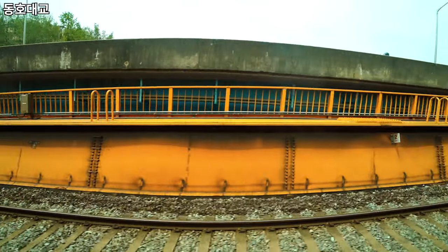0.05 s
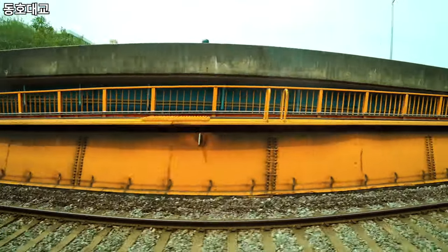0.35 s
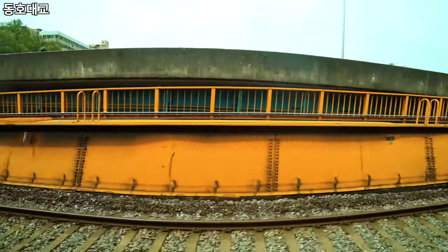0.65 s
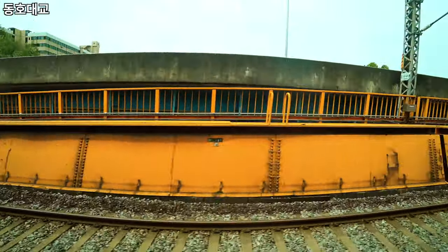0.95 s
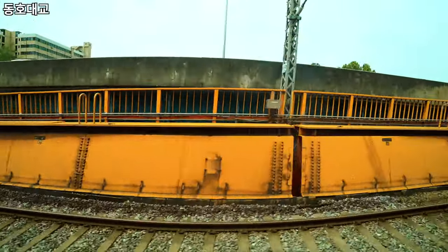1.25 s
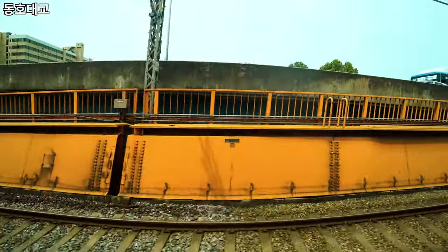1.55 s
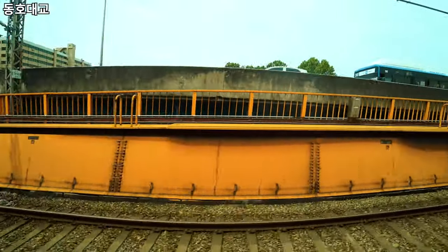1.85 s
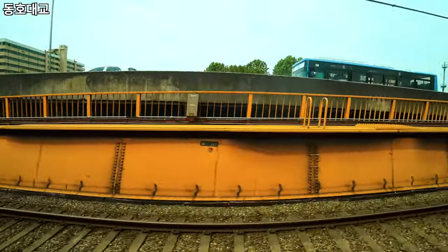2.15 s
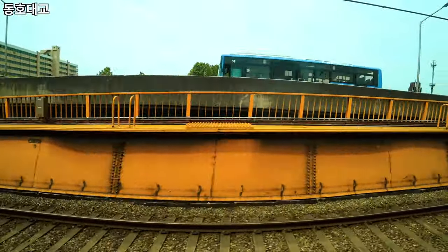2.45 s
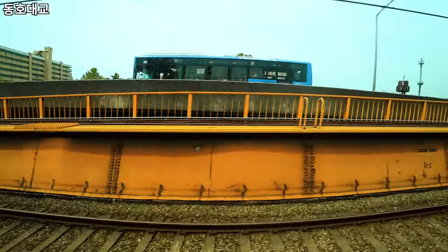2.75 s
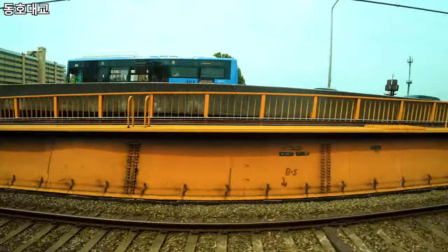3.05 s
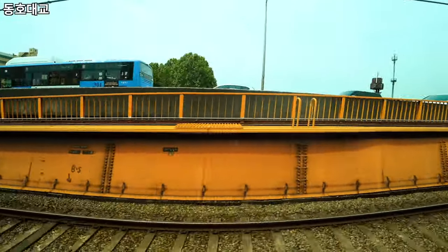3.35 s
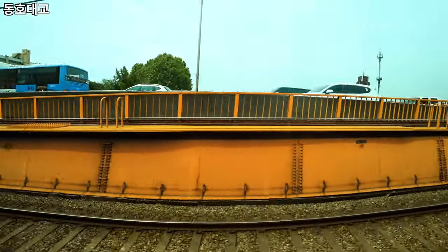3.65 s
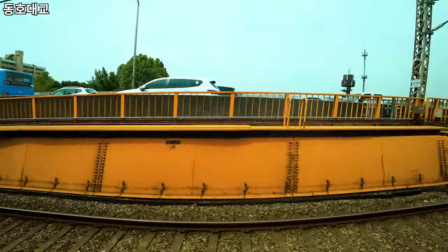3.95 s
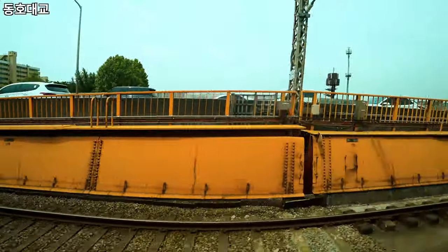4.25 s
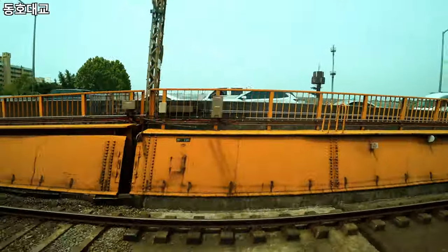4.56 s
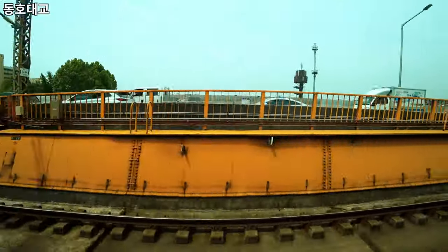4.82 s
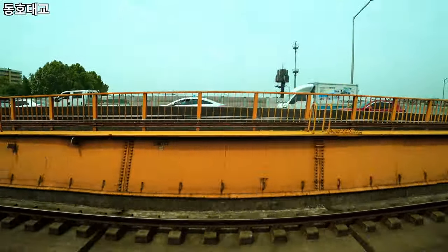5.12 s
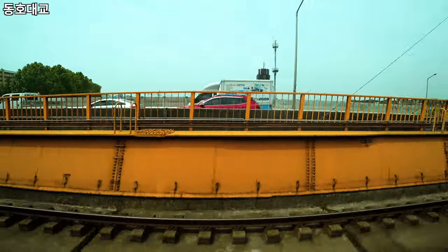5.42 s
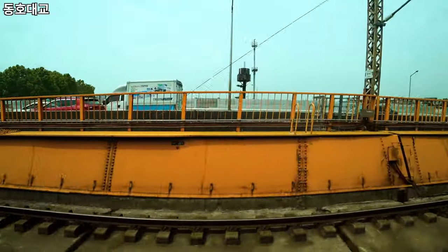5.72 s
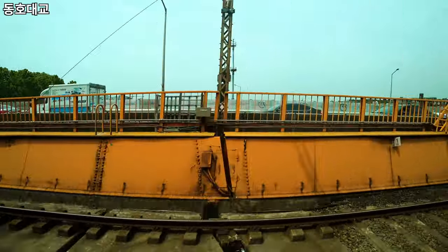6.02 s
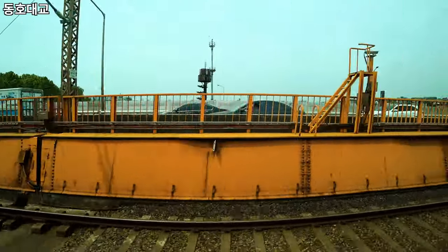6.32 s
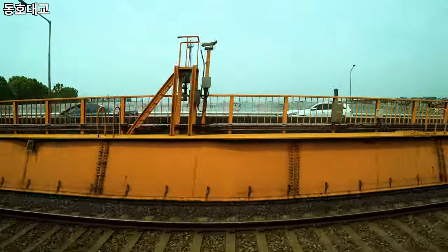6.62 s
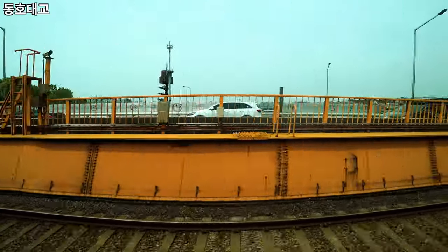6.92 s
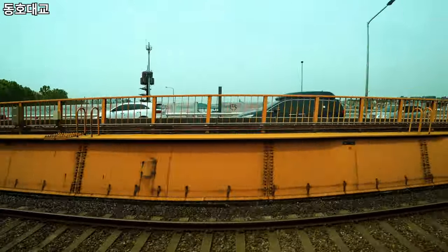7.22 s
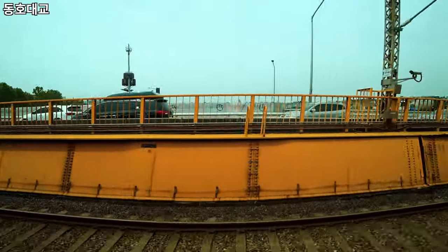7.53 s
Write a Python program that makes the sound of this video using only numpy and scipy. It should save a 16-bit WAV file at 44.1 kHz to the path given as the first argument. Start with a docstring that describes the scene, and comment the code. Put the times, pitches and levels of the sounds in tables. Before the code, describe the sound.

A subway train rumbles loudly over a steel bridge, heard from inside, with roaring wheels, soft bumps and a faint hiss of air.

```python
"""Inside a subway car rolling over a steel girder bridge.
The floor rumbles on its springs, the cabin air booms, and the wheels roar through the car body.
Rippled rail howls on one span; dips in the rail set body and girders ringing.
The rail rushes, short swells of noise stand out, and air hisses and spurts at the door seal.
Now and then a buffet of air pins the microphone and cuts the sound for a few milliseconds."""
import sys
import numpy as np
from scipy import signal
from scipy.fft import rfft, irfft, next_fast_len
from scipy.io import wavfile
from scipy.ndimage import uniform_filter1d

SR = 44100
rng = np.random.default_rng(int(sys.argv[2]) if len(sys.argv) > 2 else 0)


def materialize(psi):
    """Save the field psi as 16-bit PCM at rate SR to the path in sys.argv[1].

    A 1-D psi becomes a single channel; in a 2-D psi each row is a channel.
    """
    bounded = np.clip(np.atleast_2d(psi).T, -1, 1)
    quanta = np.round(bounded * 32767).astype(np.int16)
    wavfile.write(sys.argv[1], SR, quanta)


N = 334278
TIME_S = np.arange(N) / SR
FFT_SIZE = next_fast_len(N, real=True)
FREQ_HZ = np.maximum(np.fft.rfftfreq(FFT_SIZE, 1 / SR), 1)


def from_db(db):
    """Decibels to gain."""
    return 10 ** (np.asarray(db) / 20)


def curves(rows):
    """One per-sample curve for each column after time_s."""
    time_s, *columns = np.transpose(rows)
    return [np.interp(TIME_S, time_s, column) for column in columns]


def swells(rows, sigma_s):
    """One track of Gaussian swells for each column after centre_s."""
    centre_s, *columns = np.transpose(rows)
    bells = np.exp(-0.5 * np.minimum(((TIME_S - centre_s[:, None]) / sigma_s) ** 2, 100))
    return [heights @ bells for heights in columns]


def spectrum(points):
    """Response through (freq_hz, level_db) points, steep beyond both ends."""
    freq_hz, level_db = np.transpose(points)
    skirts = np.minimum(1, np.minimum(FREQ_HZ / freq_hz[0], freq_hz[-1] / FREQ_HZ)) ** 6
    return skirts * from_db(np.interp(np.log(FREQ_HZ), np.log(freq_hz), level_db))


def resonances(modes):
    """Response of steep-sided resonances, summed in power."""
    power = 0
    for freq_hz, width_hz, level_db in modes:
        detuning = (FREQ_HZ - freq_hz ** 2 / FREQ_HZ) / (2 * width_hz)
        power += (from_db(level_db) / (1 + 2 * detuning ** 2)) ** 2
    return np.sqrt(power)


def lowpass(corner_hz, order=2):
    """Low-pass response, half gain at the corner."""
    return 1 / (1 + (FREQ_HZ / corner_hz) ** order)


def shaped(x, response):
    """Filter by a frequency response."""
    return irfft(rfft(x, FFT_SIZE) * response, FFT_SIZE)[:N]


def noise(response):
    """Filtered Gaussian noise, rms 1."""
    x = shaped(rng.standard_normal(FFT_SIZE), response)
    return x / np.sqrt(np.mean(x ** 2) + 1e-20)


def steady_noise(response, span_s):
    """Filtered noise with swells slower than span_s evened out, rms near 1."""
    x = noise(response)
    size = int(span_s * SR)
    power = uniform_filter1d(uniform_filter1d(x ** 2, size), size)
    return x / np.sqrt(power + 1e-12)


def flutter(rate_hz, depth_db):
    """Randomly wavering gain; depth_db is rms."""
    return from_db(depth_db * noise(lowpass(rate_hz)))


# freq_hz, level_db
RUMBLE_SPECTRUM = [(7, -13), (16, -2), (25, 5), (42, 1), (56, 6), (70, 0.5), (82, -3), (92, -13.5)]
# time_s, level_db
RUMBLE_LEVELS = [(0.0, -15), (0.25, -18), (1.7, -18), (2.1, -19), (2.55, -15.5), (3.0, -17), (4.0, -16),
                 (4.6, -19.5), (5.3, -13), (5.7, -19), (6.0, -14.5), (6.35, -15.5), (6.48, -24.5),
                 (6.7, -20.5), (7.0, -15), (7.55, -18.5)]

def floor_rumble(jolt_db):
    """The car floor heaves on its springs."""
    level_db, = curves(RUMBLE_LEVELS)
    return from_db(level_db + jolt_db + 1.25) * steady_noise(spectrum(RUMBLE_SPECTRUM), span_s=0.18)


# freq_hz, level_db
BOOM_SPECTRUM = [(78, 1), (88, 0.5), (98, 0.5), (116, 0.5), (135, -1), (155, -13.5)]
# time_s, level_db
BOOM_LEVELS = [(0.0, -20), (0.25, -32.5), (0.5, -28), (1.0, -19), (1.6, -19.5), (1.8, -22), (2.12, -23.5),
               (2.4, -20.5), (3.25, -26), (3.9, -16), (4.25, -21), (4.45, -25), (4.9, -19), (5.5, -26.5),
               (6.0, -22), (6.3, -18), (6.47, -21.5), (6.7, -17.5), (7.05, -30.5), (7.55, -21.5)]

def cabin_boom(jolt_db):
    """The cabin air booms in its lowest standing waves."""
    level_db, = curves(BOOM_LEVELS)
    boom = steady_noise(spectrum(BOOM_SPECTRUM), span_s=0.05)
    return from_db(level_db + jolt_db + 0.86) * boom * flutter(rate_hz=11, depth_db=0.1)


# centre_s, rumble_change_db, boom_change_db
JOLTS = [(0.28, 10, 12.5), (0.71, 3, 5.5), (1.59, 1.5, 2.5), (2.84, -1, 2), (2.99, -5, 6.5), (3.19, -2, 5),
         (3.43, -5, 10.5), (4.11, 2.5, 2), (4.55, 5, -7), (4.78, 5.5, -2.5), (5.69, 2, 6), (5.95, 1, 2),
         (6.59, 12, -1.5), (6.92, 3.5, -2)]

def track_jolts():
    """Uneven track jolts the car: brief dB changes for rumble and boom."""
    return swells(JOLTS, sigma_s=0.035)


# freq_hz, level_db
ROAR_SPECTRUM = [(110, -8), (150, -1.5), (195, 2), (220, -2), (255, -2), (300, -6), (400, -11), (490, -14),
                 (570, -14.5), (700, -18.5), (900, -39.5)]
# freq_hz, width_hz, level_db
BODY_MODES = [(185.5, 10.7, 4), (241.9, 12.2, 2), (276, 7.2, 2), (340.3, 9.9, -2), (466.6, 74, -10.5)]
# time_s, roar_db, rush_db
TRACK_ROUGHNESS = [(0.0, -26.5, -44.5), (0.45, -25, -48), (0.95, -23.5, -43), (1.3, -23.0, -45.5),
                   (1.45, -22, -45), (1.72, -23.5, -43), (2.05, -26, -47), (2.4, -23.5, -44.5),
                   (3.0, -24, -45), (3.55, -23.5, -44), (3.95, -24, -44), (4.4, -23.5, -45.5),
                   (5.1, -24.5, -45.5), (5.55, -24.5, -44), (5.9, -23, -43.5), (6.25, -24.5, -45),
                   (6.42, -26, -48), (6.65, -24, -44), (7.15, -25.5, -48), (7.55, -24.5, -45.5)]

def wheel_roar(jolt_db):
    """Rail roughness shakes the bogies; the car's panels ring with it."""
    roar_db, _ = curves(TRACK_ROUGHNESS)
    bogies = spectrum(ROAR_SPECTRUM)
    panels = resonances(BODY_MODES)
    panel_gain = from_db(-5.5) * np.linalg.norm(bogies) / np.linalg.norm(panels)
    shaking = steady_noise(np.hypot(bogies, panel_gain * panels), span_s=0.12)   # powers add
    return from_db(roar_db + jolt_db) * shaking * flutter(rate_hz=28, depth_db=0.9)


# time_s, howl_db, girder_db
HOWL_LEVELS = [(0, -46, -55), (1, -42, -41), (1.5, -47, -42.5), (2.1, -41.5, -42.5), (3, -43.5, -43),
               (3.7, -39, -41), (4.3, -39.5, -36.5), (4.55, -35, -44), (4.8, -37, -44.5),
               (5.05, -33.5, -40), (5.23, -31.5, -40), (5.38, -35.5, -37.5), (5.47, -33, -35),
               (5.6, -37, -32.5), (5.78, -30.5, -36), (5.9, -41, -28.5), (6.0, -41, -31.5),
               (6.12, -37, -40), (6.25, -38, -34.5), (6.42, -42, -44), (6.72, -37, -35.5), (7, -53, -47),
               (7.58, -39, -53)]
# time_s, pitch_hz
HOWL_PITCH = [(0, 660), (3.3, 680), (4.0, 705), (4.6, 695), (4.95, 712), (5.13, 720), (5.22, 698),
              (5.32, 686), (5.47, 670), (5.62, 668), (5.78, 652), (5.92, 630), (6.1, 690), (6.7, 690)]
# freq_hz, width_hz, level_db
GIRDER_MODES = [(345, 55, -2.5), (402, 55, 0.5), (507, 28, -7), (633, 63, -3), (727, 32, -7),
                (843, 70, -17)]

def rail_howl():
    """Rippled rail howls at speed over ripple length; the steel girders ring along."""
    howl_db, girder_db = curves(HOWL_LEVELS)
    pitch_hz, = curves(HOWL_PITCH)
    phase = 2 * np.pi * np.cumsum(pitch_hz) / SR
    spread = lowpass(corner_hz=14)
    howl = noise(spread) * np.cos(phase) + noise(spread) * np.sin(phase)
    size = int(0.06 * SR)   # even out swells slower than 60 ms
    howl /= np.sqrt(uniform_filter1d(uniform_filter1d(howl ** 2, size), size) + 1e-12)
    girders = steady_noise(resonances(GIRDER_MODES), span_s=0.28)
    fade = from_db(0.5 * (howl_db - howl_db.max()))   # both sink away from the open span
    return fade * (from_db(howl_db - 3.5) * howl + from_db(girder_db + 4.5) * girders)


# start_s, body_db, girder_db
BUMPS = [(1.36, -25, -37), (1.491, -19.5, -33.5), (2.77, -23.5, -37), (3.54, -20.5, -48),
         (3.79, -22.5, -43), (3.92, -24, -30), (4.16, -24, -48), (4.66, -28, -41), (4.915, -26, -27.5),
         (6.084, -30, -29), (6.919, -25.5, -32.5), (7.36, -32, -42)]

def wheel_bumps(rise_s, t60_s):
    """Wheels hit dips in the rail; each soft blow rings car body and girders."""
    body_gain, girder_gain = np.zeros((2, N))
    for start_s, body_db, girder_db in BUMPS:
        age_s = np.maximum(TIME_S - start_s, 0)
        envelope = from_db(-60 * age_s / t60_s) * (1 - np.exp(-age_s / rise_s))
        body_gain += from_db(body_db + 1) * envelope
        girder_gain += from_db(girder_db + 5.5) * envelope
    body = steady_noise(resonances(BODY_MODES), span_s=0.034)
    girders = steady_noise(resonances(GIRDER_MODES), span_s=0.038)
    return body_gain * body + girder_gain * girders


# freq_hz, level_db
RUSH_SPECTRUM = [(500, -25.5), (800, 3.5), (950, 1), (1300, -1.5), (1700, -6), (2200, -8), (2750, -12.5),
                 (3000, -17.5), (3250, -21), (4500, -19)]
# freq_hz, width_hz, level_db
WHEEL_MODES = [(1167, 17, 0.5), (1372, 19, -5.5)]

def rail_rush(puff_db):
    """The contact patches rush; the wheel discs sing faintly."""
    _, rush_db = curves(TRACK_ROUGHNESS)
    contact = noise(spectrum(RUSH_SPECTRUM))
    discs = from_db(-12) * noise(resonances(WHEEL_MODES))
    return from_db(rush_db + puff_db + 1.17) * (contact + discs)


# centre_s, sigma_s, freq_hz, width_hz, level_db
ACCENTS = [(0.264, 0.0085, 2400, 600, -43), (0.254, 0.0082, 4860, 2600, -48),
           (0.277, 0.035, 5400, 220, -60), (1.095, 0.02, 1160, 80, -38.5), (1.6, 0.12, 2570, 1500, -51),
           (1.722, 0.038, 1900, 250, -48.5), (1.726, 0.011, 2830, 197, -51),
           (5.31, 0.0083, 5430, 900, -53.5), (6.11, 0.028, 684, 55, -33), (6.557, .025, 5500, 2000, -58),
           (6.69, 0.004, 1200, 1100, -37)]

def brief_accents():
    """Short swells of band noise: scuffs, a clank, a broad rush and a flare of the howl."""
    wall = lowpass(corner_hz=9600, order=16)
    sound = np.zeros(N)
    for centre_s, sigma_s, freq_hz, width_hz, level_db in ACCENTS:
        envelope = np.exp(-0.5 * ((TIME_S - centre_s) / sigma_s) ** 2)
        sound += from_db(level_db) * envelope * noise(wall * resonances([(freq_hz, width_hz, 0)]))
    return sound


# freq_hz, level_db
HISS_SPECTRUM = [(1500, -7.5), (2800, 3.5), (3300, -6.5), (3800, -4.5), (4400, -1), (4700, -3), (5050, 0),
                 (5600, -2.5), (8100, -6), (9100, -13.5), (9900, -21), (13000, -24), (14300, -27),
                 (16000, -31)]
# time_s, level_db
DRAUGHT_LEVELS = [(0.0, -56.5), (0.55, -57), (0.9, -56), (1.2, -56), (1.65, -55), (2.15, -55), (2.9, -51.5),
                  (3.2, -49.5), (3.42, -50), (3.62, -47.5), (3.74, -54), (3.83, -50), (4.04, -51),
                  (4.25, -50), (4.4, -49.5), (4.58, -52), (4.8, -48.5), (5.04, -51.5), (5.17, -48),
                  (5.28, -55), (6.25, -54.5), (6.44, -59), (6.6, -55), (7.0, -57.5), (7.12, -58.5),
                  (7.25, -54), (7.55, -53)]

def door_hiss(puff_db):
    """Air leaks past the door seal; stronger flow is louder and brighter."""
    draught_db, = curves(DRAUGHT_LEVELS)
    hiss = noise(spectrum(HISS_SPECTRUM))
    treble = signal.sosfiltfilt(signal.butter(1, 6500, "high", fs=SR, output="sos"), hiss)
    treble_db = 0.63 * (draught_db - draught_db.mean()) + 0.35 * puff_db - 0.2
    leak = hiss - treble + from_db(treble_db) * treble
    return from_db(draught_db + puff_db - 0.2) * leak * flutter(rate_hz=54, depth_db=0.3)


# centre_s, rush_change_db, hiss_change_db
PUFFS = [(.83, -1, 2.5), (.99, 2, 2), (1.39, 1.5, 3), (1.56, 1.5, 1), (1.69, 0.5, 2), (1.85, 0, 4.5),
         (3.21, 3.5, 1.5), (3.61, 2.5, -2), (4.16, 2.5, -8), (4.35, 3.5, 5), (4.69, 3, 3), (4.89, 4, 1),
         (5.15, 6, -0.5), (6.75, 1.5, 1), (6.99, 2.5, 3), (7.26, 1.5, 0)]

def seal_puffs():
    """The door seal gives and lets the outside in: brief dB changes for rush and hiss."""
    return swells(PUFFS, sigma_s=0.039)


# freq_hz, level_db
JET_SPECTRUM = [(2800, -6), (4300, -3.5), (5100, 1), (6500, -2), (8200, -0.5), (9200, -11), (10000, -16),
                (13500, -19), (15500, -29)]
# start_s, length_s, level_db
JETS = [(3.202, 0.1, -54), (3.357, 0.083, -51.5), (3.538, 0.086, -53), (4.112, 0.065, -45),
        (4.192, 0.033, -51), (4.28, 0.089, -49.5), (4.448, 0.079, -52)]

def seal_jets(attack_s, release_s):
    """The seal flaps open; a bright jet of air sputters through and dies quickly."""
    flow = np.zeros(N)
    for start_s, length_s, level_db in JETS:
        age_s = np.maximum(TIME_S - start_s, 0)
        opening = 1 - np.exp(-age_s / attack_s)
        closing = np.exp(-np.maximum(age_s - length_s, 0) / release_s)
        flow += from_db(level_db) * opening * closing
    return flow * noise(spectrum(JET_SPECTRUM)) * flutter(rate_hz=60, depth_db=2.0)


# centre_s, length_ms, signed_push
BUFFETS = [(0.0692, 6.1, -0.23), (.1615, 2.6, 0.049), (0.1988, 7.3, -.4), (0.2106, 3.3, -.2),
           (0.2741, 5.9, 0.00042), (0.2991, 2.7, -0.2), (.3311, 2.8, -0.36), (0.3682, 5.9, -0.028),
           (0.3901, 6.4, -.35), (0.431, 2.4, 0.33), (0.6143, 1.7, .3), (2.8488, 3.2, -.5),
           (3.0201, 3.1, 0.033), (3.0349, 3.1, 0.44), (3.2102, 4.1, 0.48), (3.5425, 2, .45),
           (3.647, 1.8, 0.02), (4.1696, 3.6, -0.6), (4.198, 2.2, 0.14), (4.207, 2.8, 0.43),
           (4.3293, 6.9, 0.61), (4.3775, 1.4, -0.22), (4.4057, 2.3, 0.17), (4.5509, 3.8, .35),
           (4.7265, 3.4, 0.39), (4.7783, 5.4, 0.68), (4.96, 10.9, -0.8), (5.1545, 4.4, 0.4),
           (5.5625, 2.8, 0.0062), (5.6775, 4.6, -0.049), (5.7643, 5.8, -0.19), (5.772, 2.4, -.15),
           (5.8016, 7.6, 0.4), (5.9641, 2, -0.55), (6.1825, 2.75, -0.38), (6.2044, 3.3, 0.24),
           (6.326, 4.8, -0.4), (6.3554, 4.7, .15), (6.386, 4.2, -0.2), (6.3912, 4.2, 0.12),
           (6.4187, 5.4, 0.2), (6.6883, 8.5, 0.61), (6.7782, 2.4, -.1), (6.7829, 2.7, -.15),
           (6.8277, 3.3, 0.26), (7.0484, 4.5, -0.071), (7.1779, 3.7, -0.27), (7.2096, 10, 0.33),
           (7.422, 2.9, -0.39), (7.4967, 4.9, -0.23)]

def mic_buffets(x, depth_db, edge_s, travel_s, low_cut_hz):
    """Air pins the diaphragm: the sound cuts out, sags to zero and returns with a soft pop."""
    freedom, shove = np.ones(N), np.zeros(N)
    for centre_s, length_ms, push in BUFFETS:
        near = np.abs(TIME_S - centre_s) < 0.02
        offset_s = TIME_S[near] - centre_s
        outside_s = np.abs(offset_s) - length_ms / 2000   # negative while pinned
        pinned = 0.5 * (1 - np.tanh(0.5 * outside_s / edge_s))
        freedom[near] *= 1 - (1 - from_db(depth_db)) * pinned
        speed = np.sin(np.pi * np.clip(outside_s / travel_s, 0, 1))
        shove[near] -= push * np.sign(offset_s) * speed * 2 / (travel_s * SR)
    sag = [1, -np.exp(-2 * np.pi * low_cut_hz / SR)]
    motion = signal.lfilter(sag, [1], x)
    return signal.lfilter([1], sag, motion * freedom + shove)


def crest_crackle(x, threshold, max_db):
    """The tallest crests of the rumble each leave a tiny tick."""
    mid = x.mean(axis=0)
    crests, _ = signal.find_peaks(np.abs(mid), height=threshold, distance=SR // 100)
    ticks = np.zeros(N)
    ticks[crests] = np.sign(mid[crests])
    return from_db(max_db) * ticks * rng.random(N)


# freq_hz, side_re_mid_db
STEREO_WIDTH = [(20, -51), (250, -63), (1000, -41.5), (5000, -35), (15000, -32)]

def stereo(mid):
    """The two channels differ very slightly, by a faint wavering side."""
    waver = noise(lowpass(corner_hz=15))
    side = shaped(mid * waver, spectrum(STEREO_WIDTH))
    return np.array([mid + side, mid - side])


def scene():
    """Car, bridge and door seal, mixed almost to mono."""
    jolt_rumble_db, jolt_boom_db = track_jolts()
    puff_rush_db, puff_hiss_db = seal_puffs()
    low = floor_rumble(jolt_rumble_db) + cabin_boom(jolt_boom_db)
    high = (rail_rush(puff_rush_db) + door_hiss(puff_hiss_db)) * flutter(rate_hz=68, depth_db=0.97)
    roar = wheel_roar(0.13 * jolt_boom_db)
    rough_patches = flutter(rate_hz=12, depth_db=1.05)
    mix = low + (roar + high) * rough_patches + rail_howl()
    mix += wheel_bumps(rise_s=0.011, t60_s=0.34)
    mix += brief_accents()
    mix += seal_jets(attack_s=0.0044, release_s=0.013)
    return stereo(mix)


def record(dry):
    """Buffeted microphone, soft clipping, crackle and a 15.8 kHz low-pass."""
    sound = mic_buffets(dry, depth_db=-30, edge_s=0.00009, travel_s=0.0023, low_cut_hz=52)
    clipped = sound / (1 + (sound / 0.95) ** 8) ** (1 / 8)
    ticks = crest_crackle(sound, threshold=0.42, max_db=-47)
    top_cut = signal.ellip(10, 0.1, 80, 15800, fs=SR, output="sos")
    return signal.sosfilt(top_cut, clipped + ticks)


dry = scene()
out = record(dry)
materialize(out)
```